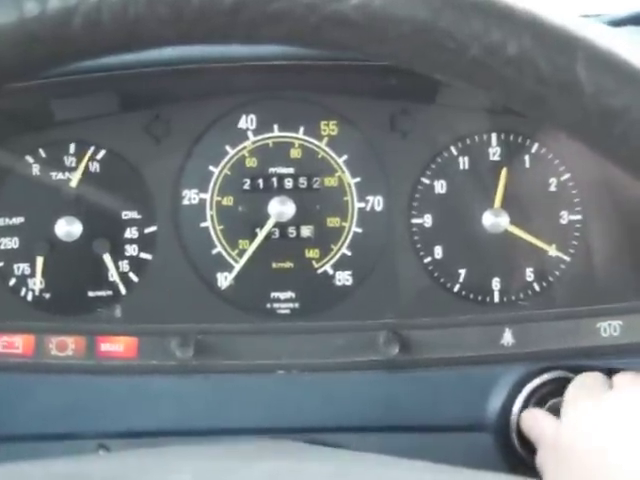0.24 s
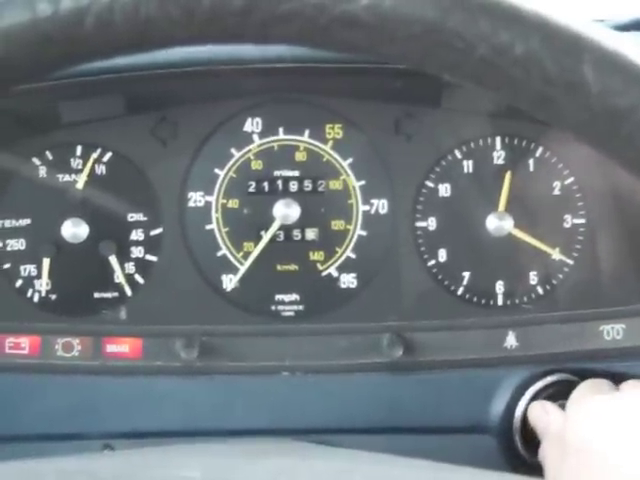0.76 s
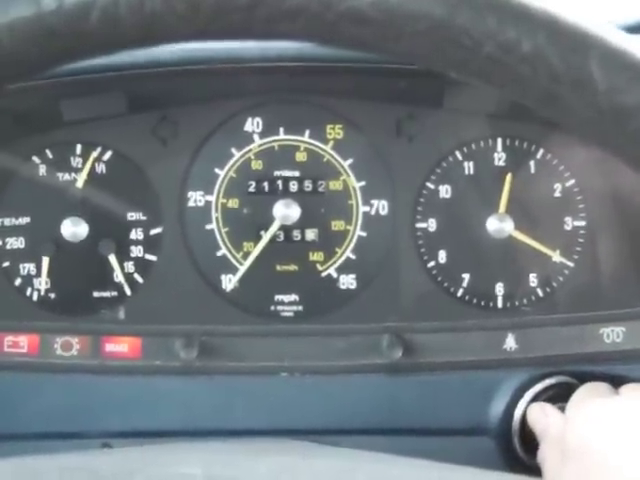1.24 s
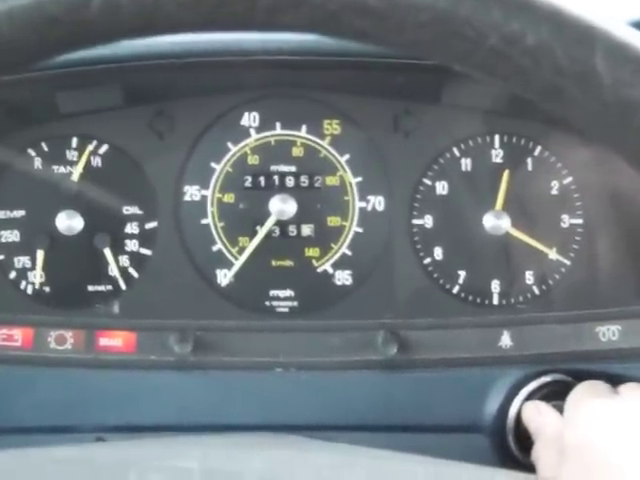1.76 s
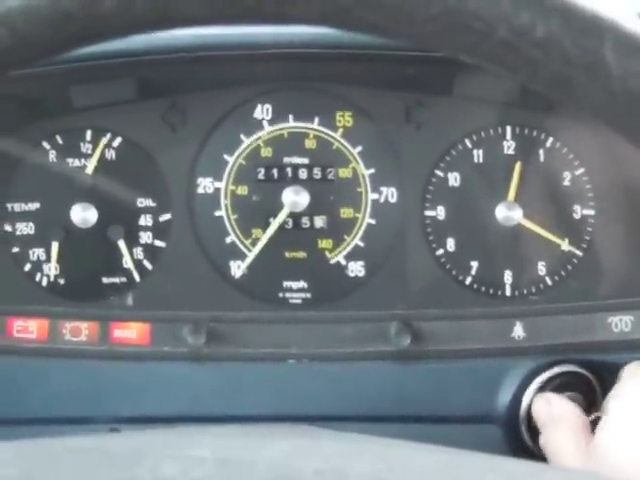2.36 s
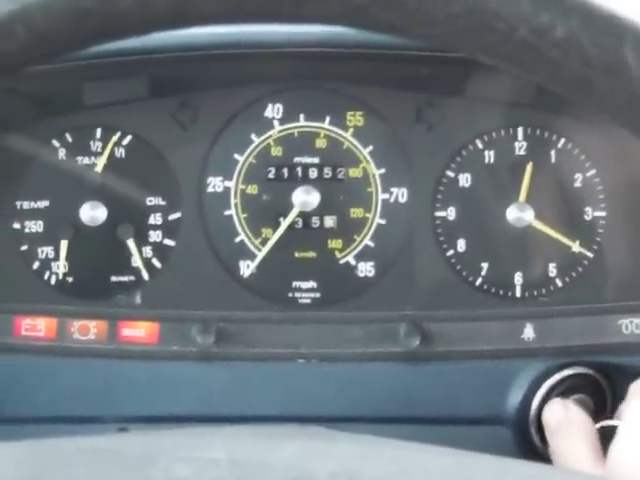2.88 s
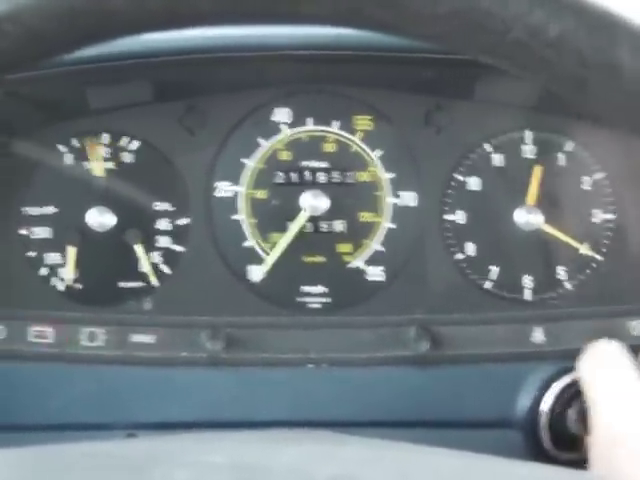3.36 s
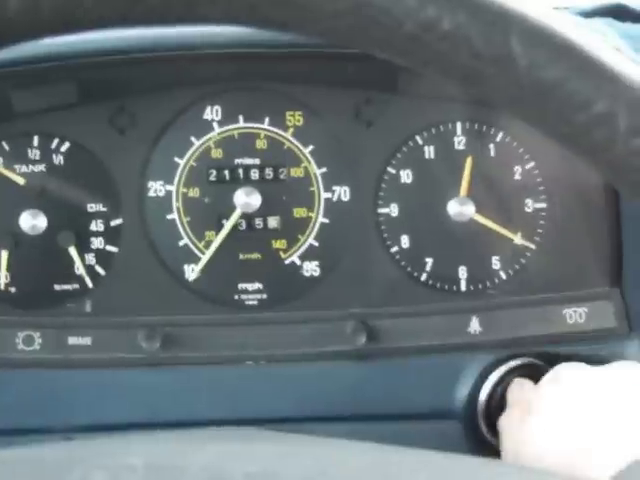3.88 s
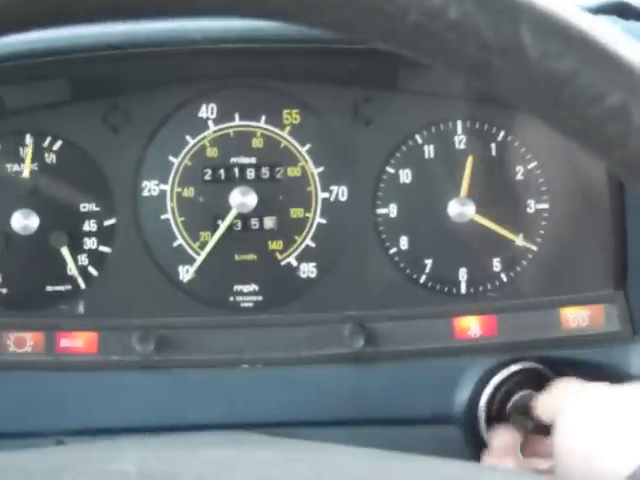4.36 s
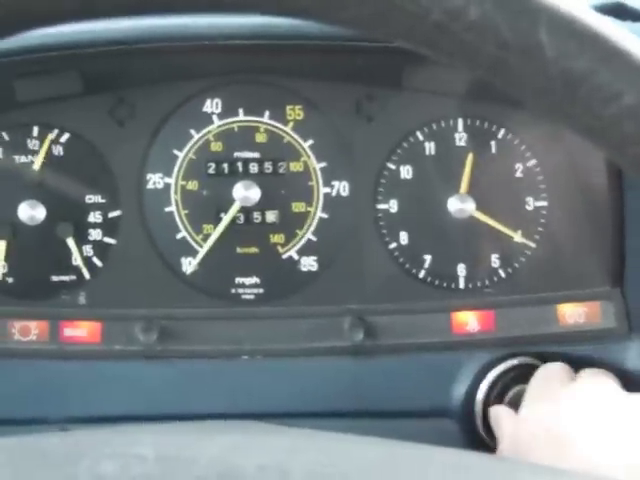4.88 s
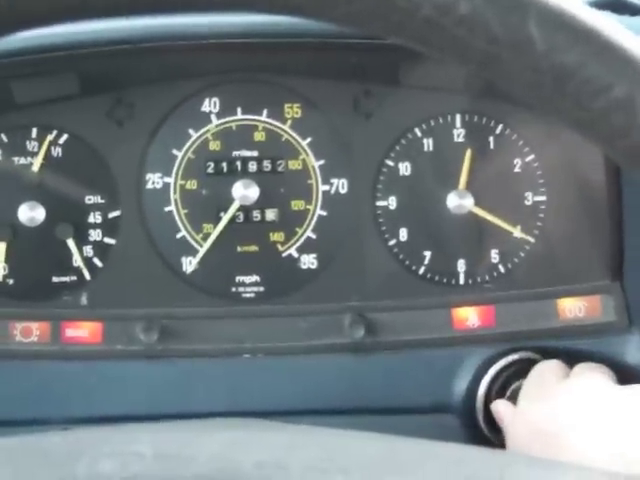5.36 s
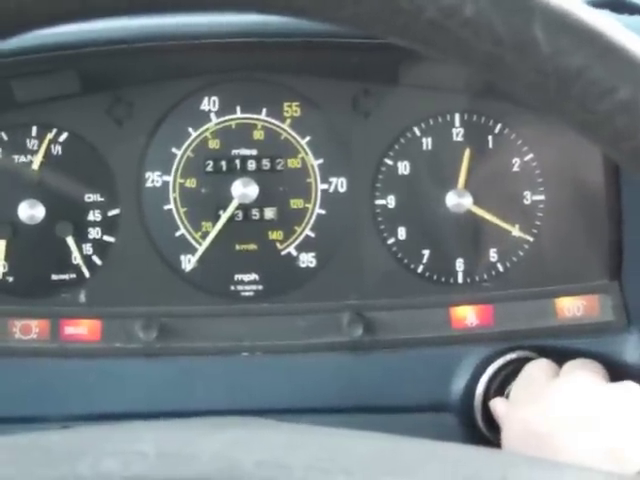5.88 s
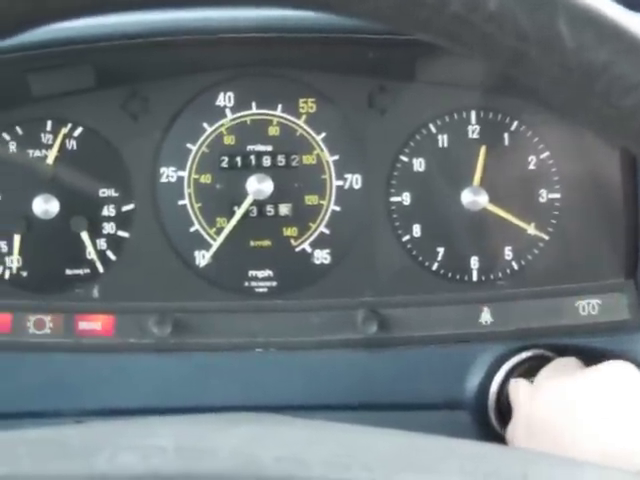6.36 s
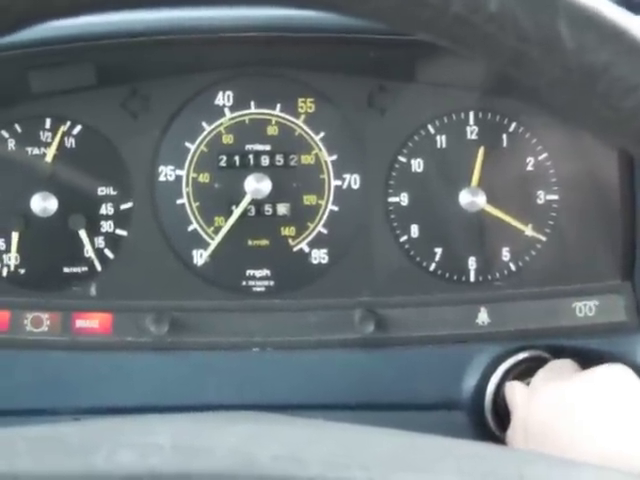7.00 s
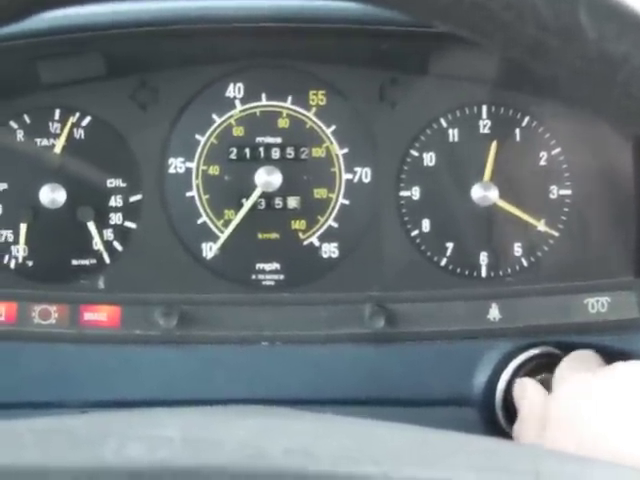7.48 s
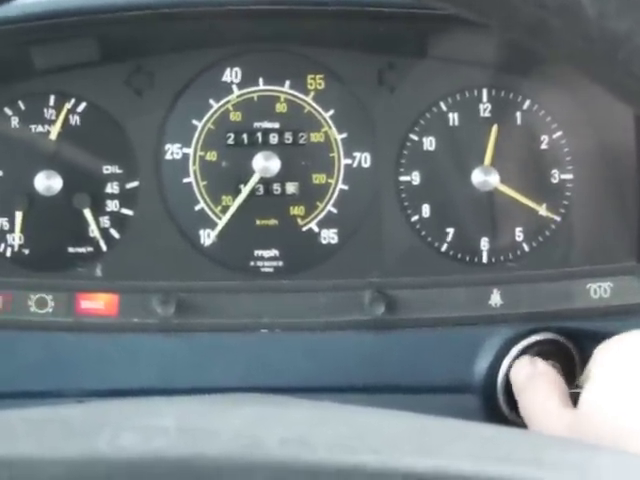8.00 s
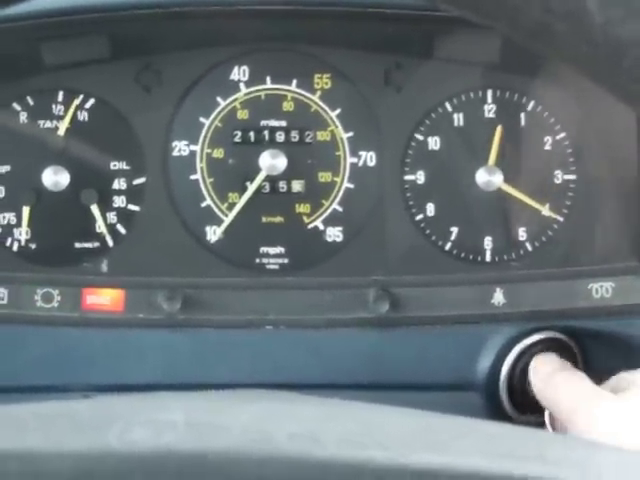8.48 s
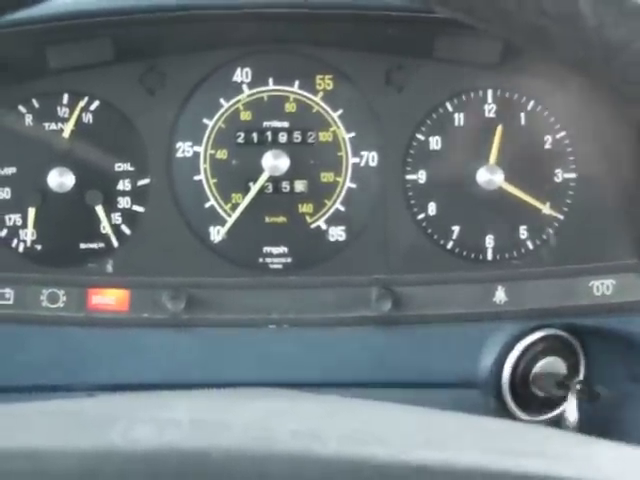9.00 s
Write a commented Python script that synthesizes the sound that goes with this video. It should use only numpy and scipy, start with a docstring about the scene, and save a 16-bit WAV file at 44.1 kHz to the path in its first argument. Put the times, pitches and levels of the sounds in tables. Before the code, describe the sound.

Inside a parked car, a starter grinds and fails, ignition keys jingle, and a second try brings the diesel to a pulsing idle.

```python
"""Inside a parked car, at the driver's seat: a cold diesel grinds through slow compressions on the
starter, fires a few times and dies. The key clinks off and on, the pinion slams in again, and the
engine catches, flares and sinks to a pulsing idle. Gear teeth whine and crunch; firings thump, knock
and rock the block on its mounts. Close by in the padded cabin are stretches of soft rustle and hiss,
short stick-slip creaks like rubbing fingers, and some small mechanism that whirrs once a second."""
import sys
import numpy as np
from scipy import signal
from scipy.fft import rfft, irfft, next_fast_len
from scipy.io import wavfile
from scipy.ndimage import uniform_filter1d, map_coordinates

SR = 44100
rng = np.random.default_rng(int(sys.argv[2]) if len(sys.argv) > 2 else 0)


def log_audio(samples):
    """Write samples as a 16-bit WAV file to the path given in sys.argv[1]."""
    # one column per channel
    frames = np.atleast_2d(samples).T
    # limit to full scale, then quantise
    limited = np.clip(frames, -1, 1)
    pcm = np.round(limited * 32767).astype(np.int16)
    wavfile.write(sys.argv[1], SR, pcm)


N = 407484

# the block on its rubber mounts: f/Hz, level/dB, t60/s
MOUNT_MODES = [(15.56, 2.5, 0.58), (26.74, -14, 1), (49.8, 1, 0.24)]
# body shell: f/Hz, level/dB, t60/s
PANEL_MODES = [(83.5, 3.5, 0.25), (126.2, -1.5, 0.16), (156.4, -5, 0.22)]
# one firing, felt through the bulkhead: f/Hz, level/dB, t60/s
THUMP_MODES = [(52.3, -13.5, 0.096), (113.8, 3, 0.068), (155.2, -2.5, 0.089)]
# low boom of the engine: f/Hz, level/dB
BOOM_SPECTRUM = [(35, -9), (70, 4), (165, -1), (220, -13.5), (330, -13), (520, -21), (900, -33)]
# rustle and scuffs: f/Hz, level/dB
RUSTLE_SPECTRUM = [(200, 17.5), (600, 7), (5000, 3), (7500, -1), (10500, 3), (15500, -5.5)]
# each start: pinion engages/s, first drag/s, release/s, tooth rate on engaging/Hz, armature ring/dB
START_ATTEMPTS = [(0.356, 0.665, 2.225, 215.3, -52.5), (6.21, 6.538, 7.654, 261.7, -54)]
# compressions, one list per start: t/s, gear crunch/dB, firing thump/dB
CRANK_STROKES = [
    [(.757, -29, -42), (.892, -26, -15.5), (1.005, -25, -34), (1.105, -27, -29), (1.208, -26.5, -33),
     (1.309, -25, -16), (1.404, -26.5, -14), (1.497, -30.5, -16), (1.583, -27, -18), (1.672, -23.5, -16),
     (1.763, -26.5, -33), (1.842, -30, -24), (1.917, -26, -4), (1.994, -25.5, -13), (2.072, -27, -7),
     (2.149, -26, -7), (2.224, -37, -5), (2.298, -37, -4), (2.374, -34, -15.5), (2.45, -46, -35),
     (2.55, -58, -38)],
    [(6.619, -28, -39), (6.755, -27.5, -23.5), (6.876, -27.5, -32), (6.97, -26, -23), (7.068, -27.5, -26),
     (7.165, -27, -23), (7.251, -31, -14), (7.331, -29.5, -11), (7.402, -26, -7), (7.476, -31.5, -11),
     (7.544, -38, -12), (7.605, -26.5, -19), (7.669, -34, -15), (7.733, -32.5, -7.5), (7.787, -39, -26)],
]


def amp(db):
    return 10 ** (np.asarray(db) / 20)


def unit(x):
    return x / np.sqrt(np.mean(x ** 2) + 1e-20)


def clock(count=N):
    return np.arange(count) / SR


def curves(rows):
    """One value per sample for each column after the time."""
    times, *columns = np.transpose(rows)
    return [np.interp(clock(), times, column) for column in columns]


def wobble(rate):
    """A smooth random curve, rate knots a second."""
    steps = np.arange(0, N * rate / SR + 1, 1 / 8)
    knots = rng.standard_normal(int(N * rate / SR) + 4)
    return np.interp(clock() * rate, steps, map_coordinates(knots, [steps]))


def filtered(x, response):
    """x shaped by a frequency response."""
    size = next_fast_len(N + SR // 2)
    return irfft(rfft(x, size) * response(np.fft.rfftfreq(size, 1 / SR)), size)[:N]


def noise(spectrum):
    """Noise of rms 1, coloured by rows of f/Hz, level/dB."""
    f, db = np.transpose(spectrum)
    gain = lambda hz: amp(np.interp(np.log(hz + 1), np.log(f), db, left=-120, right=-120))
    return unit(filtered(rng.standard_normal(N), gain))


def resonate(x, peaks):
    """x through resonances of f/Hz, width/Hz, level/dB."""
    def response(f):
        return sum(amp(db) * 1j * f * width / (hz * hz - f * f + 1j * f * width)
                   for hz, width, db in peaks)
    return filtered(x, response)


def add(track, s, sound):
    """Mix a sound in at s seconds."""
    part = track[max(round(s * SR), 0):][:len(sound)]
    part += sound[:len(part)]


def bursts(times, levels_db, attack, t60):
    """Envelope of blows that rise and die away; their powers add."""
    t, power = clock(SR // 2), np.zeros(N)
    shape = (1 - np.exp(-t / attack)) * amp(-60 * t / t60)
    shape = (shape / shape.max()) ** 2
    for s, db in zip(times, levels_db):
        add(power, s, shape * amp(2 * db))
    return np.sqrt(power)


def swells(times, levels_db, peak_s):
    """Envelope of rounded pushes, each strongest peak_s after it begins."""
    age, out = clock(SR // 4) / peak_s, np.zeros(N)
    for s, db in zip(times, levels_db):
        add(out, s, amp(db) * (age * np.exp(1 - age)) ** 1.5)
    return out


def rings(times, levels_db, modes, attack, scatter_db, detune):
    """Each blow rings the modes, scattered in strength and pitch."""
    hz, db, t60 = np.transpose(modes)[:, :, None]
    t, out = clock(int(SR * t60.max())), np.zeros(N)
    decay = amp(db - db.max() - 60 * t / t60) * (1 - np.exp(-t / attack))
    for s, level in zip(times, levels_db):
        size, shift = rng.standard_normal((2, len(hz), 1))
        partials = np.sin(2 * np.pi * hz * (1 + detune * shift) * t)
        add(out, s, np.sum(amp(level + scatter_db * size) * decay * partials, 0))
    return out


def room_tone(hum_hz=60):
    """The low rumble and faint steady hum of the parked car."""
    # cabin air: f/Hz, level/dB
    rumble_spectrum = [(15, -26), (25, 4), (42, -6.5), (58, 4.5), (80, -9.5), (130, -3), (180, -14.5),
                       (400, -24.5), (2400, -32), (15000, -41.5)]
    hum = amp(-52) * unit(np.sin(2 * np.pi * hum_hz * clock()))
    return hum + amp(-46.5 + wobble(4.79)) * noise(rumble_spectrum)


def rustle(attack_s=.0037, release_s=.024, resting_db=-74.5):
    """Stretches of soft, high rustle and hiss close by."""
    # stretches of rustle or hiss: t/s, length/s, level/dB
    stretches = [(0, 0.1, -54.5), (1.894, 0.75, -48.5), (2.605, 1, -57), (3.587, 0.62, -51.5),
                 (4.376, 0.33, -49), (4.748, 0.49, -55), (7.868, 0.14, -46.5), (8.244, 0.28, -49.5),
                 (8.503, 0.45, -51.5), (8.905, 0.31, -47.5)]
    t, envelope = clock(), amp(resting_db)
    for s, length, db in stretches:
        gate = np.clip((t - s) / attack_s, 0, 1) * np.exp(-np.maximum(t - s - length, 0) / release_s)
        envelope = np.maximum(envelope, amp(db) * gate)
    return envelope * amp(1.8 * wobble(97)) * noise(RUSTLE_SPECTRUM)


def whirr(first_s=.875, every_s=1.0, half_length_s=.034):
    """A faint, grainy mechanism swells and fades in a small casing, regular as clockwork."""
    # its casing: f/Hz, width/Hz, level/dB
    casing = [(1810, 240, -7), (2620, 690, -2.5), (3170, 300, 3), (4440, 270, 0.5), (4830, 200, -5)]
    offset = (clock() - first_s + every_s / 2) % every_s - every_s / 2
    swell = np.exp(-(offset / half_length_s) ** 2 / 2)
    grains = noise([(700, 9), (1500, 3.5), (5200, -6.5), (6500, -35)]) * amp(2.9 * wobble(150))
    return amp(-48) * swell * unit(resonate(grains, casing))


def creaks(squeak_t60=.031, scuff_t60=.082):
    """Short stick-slip creaks close by, like rubbing fingers; each slip squeaks, scuffs and ticks."""
    # runs of slips: t/s, length/s, level/dB, pitch/Hz, slip rate/Hz
    runs = [(3.712, .045, -45.5, 680, 114), (4.087, .008, -39, 2540, 290), (5.003, .018, -49.5, 376, 174),
            (5.484, .06, -49.5, 235, 70), (5.558, .11, -44.5, 223, 106)]
    # creak resonances: f/Hz, width/Hz, level/dB
    resonances = [(395, 31, 11), (804, 130, 0), (1090, 260, -4.5), (1605, 99, -2.5), (2170, 84, -2),
                  (3070, 33, -8)]
    squeaks, ticks, scuffs = np.zeros((3, N))
    t = clock(SR // 30)
    for s, length, db, hz, rate in runs:
        for slip in np.arange(0, length, 1 / rate):
            late, size, shift = rng.standard_normal(3)
            when, level = s + slip + .3 * late / rate, db + 3 * size
            tone = np.sin(2 * np.pi * hz * np.exp(.116 * shift) * t)
            add(squeaks, when, amp(level + 12 - 60 * t / squeak_t60) * tone)
            add(ticks, when, amp([level + 35]))
            add(scuffs, when, amp(level - 17 - 60 * t / scuff_t60))
    return squeaks + resonate(ticks, resonances) + scuffs * noise(RUSTLE_SPECTRUM)


def keys():
    """Each contact thuds in the dashboard, clicks in the lock and rings the keys."""
    # key on lock: t/s, level/dB, brightness/dB (below 0 a dull clunk, above 0 a clink)
    contacts = [(0.2726, -35.5, -3), (0.3226, -30.5, -1), (0.9969, -34, 2.5), (1.883, -30.5, -11),
                (1.916, -26.5, 0.5), (2.062, -30, -1.5), (2.2467, -28.5, -1.5), (2.28, -29.5, 2),
                (2.3254, -30, -0.5), (2.396, -26, 8.5), (2.4884, -27.5, -3.5), (3.032, -40, -5),
                (3.0773, -35, -1), (3.092, -30, -1.5), (3.244, -36, -7), (3.254, -31.5, -1),
                (3.2834, -26.5, -4), (3.3, -14.5, -5.5), (3.31, -12, 6), (3.398, -36.5, -5.5),
                (3.485, -45, -8), (3.619, -36, 0.5), (3.7569, -32, -1.5), (3.934, -37.5, -11),
                (3.9966, -21, -4.5), (4.022, -28, -7.5), (4.049, -23.5, -1.5), (4.065, -23, -6.5),
                (4.106, -25.5, 8.5), (4.118, -25, -7), (4.1753, -30.5, -2), (4.366, -36.5, -8),
                (4.5464, -32.5, 1), (4.62, -32, -2.5), (4.6673, -30, 2.5), (6.149, -39.5, -4),
                (6.159, -37, 0), (6.17, -28, -3), (7.7222, -27, 4), (8.1727, -24, 8), (8.358, -38, -15.5),
                (8.458, -35.5, -13), (8.4861, -32, -14)]
    # low, middle and top of a contact: f/Hz, level/dB
    clunk_spectrum = [(70, -18), (110, 11), (300, 4.5), (800, 3), (1600, 2), (2600, -6), (5000, -57)]
    click_spectrum = [(1000, -7), (2200, 0), (3200, 7), (6000, 0), (9000, -54)]
    sparkle_spectrum = [(4500, -1), (7500, 1.5), (9500, 2.5), (13000, -3), (16000, -8)]
    # keys and lock barrel: f/Hz, level/dB, t60/s
    metal_modes = [(1570, -2, .07), (2850, -7, .35), (3900, -1, .07), (4630, -3, .06), (5010, 1, .07),
                   (5400, -2, .06), (6060, 1, .09), (8440, 3, .09), (9650, -3, .06)]
    # small parts of the lock: f/Hz, level/dB, t60/s
    tumbler_modes = [(992, 0, 0.047), (1682, 1.5, 0.02), (2960, -1, 0.018), (4114, 4, 0.015),
                     (5167, -1, 0.036)]
    s, db, bright_db = np.transpose(contacts)
    clunk = bursts(s, db - bright_db - 9.5, attack=.00054, t60=.09) * noise(clunk_spectrum)
    click = bursts(s, db - 9, attack=.00042, t60=.085) * noise(click_spectrum)
    sparkle = bursts(s, db + bright_db - 8.5, attack=.00044, t60=.062) * noise(sparkle_spectrum)
    jingle = rings(s, db - 20.5, metal_modes, attack=.0004, scatter_db=3, detune=.012)
    thud = rings(s, db - 12.5, PANEL_MODES, attack=.006, scatter_db=1.5, detune=.024)
    tumblers = rings(s, db - 5, tumbler_modes, attack=.0003, scatter_db=3, detune=.12)
    grit = unit(amp(1.1 * wobble(400)))
    return (clunk + click + sparkle) * grit + jingle + tumblers + thud


def cabin(x, t60, wet_db):
    """Glass and upholstery give a very short answer."""
    t = clock(SR // 4)
    tail = rng.standard_normal(len(t)) * amp(-60 * t / t60) * (t > .003)
    return x + amp(wet_db) * signal.fftconvolve(x, tail / np.linalg.norm(tail))[:N]


def gear_noise():
    """Gritty meshing of rms 1 that rings the bell housing."""
    # scraping teeth: f/Hz, level/dB
    mesh_spectrum = [(120, -23), (200, 4.5), (420, 1.5), (750, 0), (1300, -26.5), (1800, -25.5),
                     (3400, -23.5), (7000, -80)]
    # bell housing: f/Hz, width/Hz, level/dB
    housing = [(583, 6.2, 3), (933, 9.2, -3.5), (1046, 23, 0), (1338, 10, -13), (1532, 15, -6.5)]
    ring = unit(resonate(rng.standard_normal(N), housing))
    return unit((noise(mesh_spectrum) + amp(-4.5) * ring) * amp(2.2 * wobble(300)))


def strokes():
    """Pinion jolts and piston strokes, as columns t/s, crunch/dB, thump/dB, rocking/dB, boom/dB."""
    # the pinion slams in: crunch/dB, thump/dB, rocking/dB, boom/dB
    jolt_db = (-26.5, -29, -39, -35)
    # force of the strokes as cylinders begin to fire, one curve per start: t/s, rocking/dB, boom/dB
    efforts = [
        [(.76, -36.5, -31.5), (.9, -29.5, -26.5), (1.3, -29, -30), (1.8, -25, -22), (2.15, -21.5, -21.5),
         (2.33, -20.5, -21.5), (2.55, -31, -43)],
        [(6.62, -33, -33), (7, -28.5, -27), (7.25, -27.5, -24.5), (7.4, -22.5, -21.5), (7.7, -23.5, -21),
         (7.8, -36, -27)],
    ]
    rows = [(engage, *jolt_db) for engage, *_ in START_ATTEMPTS]
    for cranking, effort in zip(CRANK_STROKES, efforts):
        times, rock_db, boom_db = np.transpose(effort)
        for s, *levels in cranking:
            rows.append((s, *levels, np.interp(s, times, rock_db), np.interp(s, times, boom_db)))
    return np.transpose(rows)


def starter_motion(free_tooth_hz=348, spin_up_s=.14, drag_share=.44, drag_s=.058):
    """Tooth rate and four gains as the starter spins up, labours, cranks and lets go."""
    t, motion = clock(), np.zeros((5, N))
    hump = lambda s: np.exp(-((t - s) / drag_s) ** 2)
    for (engage, drag, release, engage_hz, ring_db), cranking in zip(START_ATTEMPTS, CRANK_STROKES):
        times = np.transpose(cranking)[0]
        crank_hz = np.interp(t, times[1:], 1 / np.diff(times))
        octaves = np.log2(crank_hz / 10)
        age, coasting = np.maximum(t - engage, 0), np.maximum(t - release, 0)
        on = np.clip((t - engage) / .02 + 1, 0, 1)
        meshed = on * amp(-50 * coasting)
        tooth_hz = free_tooth_hz + (engage_hz - free_tooth_hz) * np.exp(-age / spin_up_s)
        tooth_hz *= 1 - drag_share * hump(drag)  # the first compression drags the speed down
        # the whine is loud on engaging and swells again as the motor slows
        whine_db = -50.5 + 16 * np.exp(-age / .37) + 10 * hump(drag - .046)
        bite_db = np.interp(t, [drag - drag_s, drag], [-12, 0])  # teeth meet compression
        hiss_db = -51.5 + .49 * bite_db + 11.5 * octaves - 60 * coasting
        sing_db = ring_db + 3.5 * octaves - 60 * coasting
        whine, grind, sing = meshed * amp([whine_db, bite_db - 47.5, sing_db])
        motion = np.where(on > 0, [tooth_hz, whine, grind, on * amp(hiss_db), sing], motion)
    return motion


def starter(armature_hz=2266, waver=.01387):
    """The pinion growls, slowing at every compression; the armature sings and the brushes hiss."""
    # gear whine: multiple of the tooth rate, level/dB
    harmonics = [(1, 22.5), (2, 26.5), (4, 17.5)]
    # motor brushes: f/Hz, level/dB
    brush_spectrum = [(1200, 8.5), (2400, 1.5), (3500, 4), (6500, -2.5), (7800, -7.5), (13000, -10.5),
                      (16000, -23)]
    s = strokes()[0]
    load = bursts(s, np.zeros_like(s), attack=.019, t60=.16)
    tooth_hz, whine_gain, grind_gain, hiss_gain, sing_gain = starter_motion()
    backlash, chatter = .042 * wobble(260), amp(3.5 * wobble(300))
    phase = 2 * np.pi * np.cumsum(tooth_hz * (1 - .08 * load + backlash)) / SR
    teeth = unit(chatter * sum(amp(db + wobble(110)) * np.sin(k * phase) for k, db in harmonics))
    scrape = gear_noise() * (1 + np.cos(phase))  # one scrape as each tooth engages
    gears = whine_gain * (teeth + .62 * scrape) + grind_gain * scrape
    ring_hz = armature_hz * (1 + waver * (wobble(20) + wobble(300)))
    flutter = amp(6.5 * load - 4.5 + 3 * wobble(25) + 3 * wobble(130))
    sing = flutter * unit(np.sin(2 * np.pi * np.cumsum(ring_hz) / SR))
    switch_on = [engage - .012 for engage, *_ in START_ATTEMPTS]
    inrush = bursts(switch_on, [-41] * len(switch_on), attack=.011, t60=.067)
    hiss = noise(brush_spectrum) * amp(6.1 * load - 1.5 + 1.94 * wobble(150))
    return gears + (sing_gain + .25 * inrush) * sing + (hiss_gain + inrush) * hiss


def compressions(firing_delay_s=.03, loaded_tooth_hz=191.3, rebound_s=.011):
    """Each stroke clangs the flywheel, hammers the teeth and rocks the block; its firing thumps after."""
    # the stalled block rocks to rest: t/s, level/dB
    shudders = [(2.604, -23), (2.669, -24), (2.733, -30.5)]
    # teeth under full load: f/Hz, level/dB
    clash_spectrum = [(500, 0), (900, 5), (1700, 1.5), (2100, -8), (6500, -17)]
    # ring gear struck by the pinion: f/Hz, level/dB, t60/s
    flywheel = [(935, -2.5, 0.13), (1083, -1.5, 0.066), (1358, -3, 0.057), (1628, -7.5, 0.04)]
    s, crunch_db, thump_db, rock_db, boom_db = strokes()
    shudder_s, shudder_db = np.transpose(shudders)
    rock = rings(np.r_[s + .004, shudder_s], np.r_[rock_db + 14, shudder_db], MOUNT_MODES,
                 attack=.008, scatter_db=1, detune=.02)
    shell = rings(s + .00745, boom_db + 8, PANEL_MODES, attack=.021, scatter_db=3, detune=.029)
    thump = rings(s + firing_delay_s, thump_db, THUMP_MODES, attack=.0058, scatter_db=.5, detune=.053)
    boom = bursts(s, boom_db, attack=.0014, t60=.71) * noise(BOOM_SPECTRUM)
    tooth_phase = 2 * np.pi * np.cumsum(loaded_tooth_hz * (1 + .15 * wobble(40))) / SR
    hammer = unit(np.exp(.8 * np.cos(tooth_phase)))
    crunch = swells(s, crunch_db - 5.5, peak_s=.021) * gear_noise()
    clash = swells(s, crunch_db - 9.5, peak_s=.0082) * noise(clash_spectrum)
    clang = sum(rings(s + delay, crunch_db - 8.5, flywheel, attack=.0009, scatter_db=3, detune=.035)
                for delay in (0, rebound_s))  # the pinion hits twice across its backlash
    return rock + shell + thump + boom + hammer * (crunch + clash) + clang


def running_engine(first_cylinder_s=9.006, valve_lag=.35):
    """Firings throb, thump and knock; the exhaust drones, valves tap and the block lurches as it revs."""
    # flare and fall to idle: t/s, firing rate/Hz
    speed = [(7.78, 20.7), (7.9, 25.5), (7.98, 31), (8.05, 38.5), (8.18, 42.5), (8.25, 46.5), (8.36, 51.5),
             (8.46, 45.5), (8.56, 37.5), (8.66, 30.5), (8.8, 27), (9.0, 27.1), (9.24, 28)]
    # engine mix: t/s, throb/dB, exhaust drone/dB, clatter/dB
    mix = [(7.8, -20, -26, -46.5), (7.93, -20.5, -21.5, -39), (8.08, -17.5, -21, -36.5),
           (8.28, -18.5, -20, -32), (8.48, -17, -26.5, -32.5), (8.6, -21.5, -29, -38.5),
           (8.72, -24.5, -49, -40), (8.92, -20, -44, -38.5), (9.24, -18, -39, -39)]
    # five cold cylinders firing unequally: level/dB
    cylinders = [-0.5, 1, 3.5, 2.5, 5]
    # exhaust drone: multiple of the firing rate, level/dB
    harmonics = [(2, 5), (3, 1)]
    # combustion in the block: f/Hz, level/dB, t60/s
    knock_modes = [(1050, 7.5, 0.049), (1537, -4, 0.12)]
    # valve gear: f/Hz, level/dB, t60/s
    tappet_modes = [(665, -6.5, 0.078), (753, 4, 0.026), (894, -5, 0.03)]
    # diesel clatter: f/Hz, level/dB
    clatter_spectrum = [(120, -20), (190, -4.5), (450, -0.5), (620, -9.5), (1300, -9.5), (1800, -19),
                        (8000, -40), (11000, -32)]
    t = clock()
    firing_hz, = curves(speed)
    throb_db, drone_db, clatter_db = curves(mix)
    gate = np.clip(np.minimum(t - mix[0][0], mix[-1][0] + .03 - t) / .02, 0, 1)
    firings = np.cumsum(firing_hz) / SR
    firings -= np.interp(first_cylinder_s, t, firings)  # the first cylinder fires at this moment
    revs = np.maximum(firing_hz / firing_hz[-1] - 1, 0)  # 0 at idle, 1 at twice idle speed
    blow_db = clatter_db - 8 * revs  # above idle, single blows merge into a steady ringing

    phase = 2 * np.pi * (firings + .1)  # the pressure leads the knock
    cylinder_db = np.interp(firings, np.arange(len(cylinders)), cylinders, period=len(cylinders))
    stagger = .25 * wobble(16)  # cold firings come early or late
    puff = np.exp(np.cos(phase))
    throb = unit((puff.mean() - puff) * amp(cylinder_db + (.4 + 3.1 * revs) * wobble(22)))
    drone = unit(sum(amp(db + 1.5 * wobble(14)) * np.sin(k * phase + stagger) for k, db in harmonics))

    onsets = lambda lag: np.flatnonzero(np.diff(np.floor(firings - lag)) * (gate[1:] > 0))
    fired, tapped = onsets(0), onsets(valve_lag)  # the valves follow by a share of a firing
    s = fired / SR
    thump = rings(s, blow_db[fired] + 12.5, THUMP_MODES, attack=.0039, scatter_db=0, detune=.024)
    lurch = revs * rings(s, throb_db[fired] - 2, MOUNT_MODES, attack=.004, scatter_db=4, detune=.1)
    knock = rings(s, blow_db[fired] + 7, knock_modes, attack=.002, scatter_db=2, detune=.025)
    tap_db = blow_db + 15.5 - 20 * revs
    taps = rings(tapped / SR, tap_db[tapped], tappet_modes, attack=.003, scatter_db=1.5, detune=.015)

    firing_decay = uniform_filter1d(np.exp(-(firings % 1) / .3), SR // 400)
    pulse = unit(.6 + firing_decay * amp(3 * wobble(30)))
    block_ring = unit(resonate(rng.standard_normal(N), [(hz, 70, 0) for hz, *_ in knock_modes]))
    clatter = amp(clatter_db - 2) * (noise(clatter_spectrum) + .56 * revs * block_ring)
    boom = amp(blow_db + 7.5) * noise(BOOM_SPECTRUM)
    body = amp(throb_db) * throb + amp(drone_db) * drone + pulse * (clatter + boom)
    return gate * body + thump + lurch + knock + taps


def scene():
    engine = compressions() + starter() + running_engine()
    handling = cabin(keys() + creaks(), t60=.11, wet_db=-11.5)
    return (engine + handling + whirr() + rustle() + room_tone())[None]


def record(dry, ceiling=.68, low_hz=5, top_hz=16000):
    """Round off the largest peaks, then cut the deepest lows and the very top."""
    rounded = dry[0] / (1 + np.abs(dry[0] / ceiling) ** 6) ** (1 / 6)
    return filtered(rounded, lambda hz: hz / np.hypot(hz, low_hz) * (hz < top_hz))[None]


dry = scene()
out = record(dry)
log_audio(out)
```